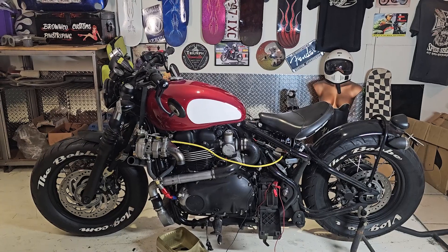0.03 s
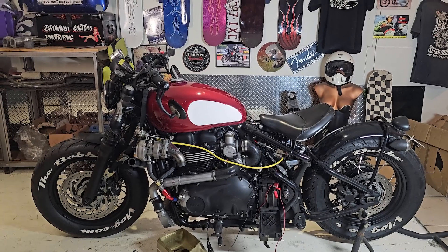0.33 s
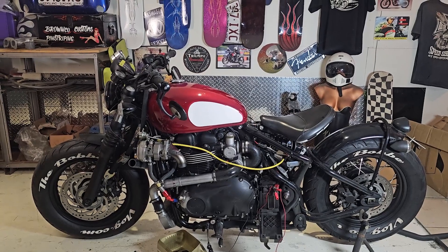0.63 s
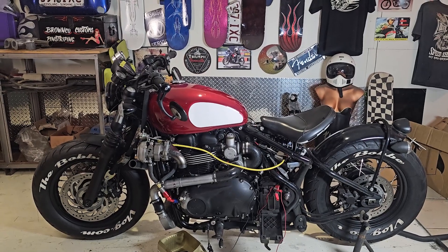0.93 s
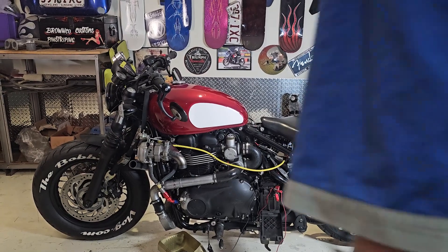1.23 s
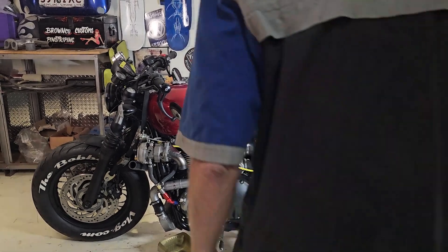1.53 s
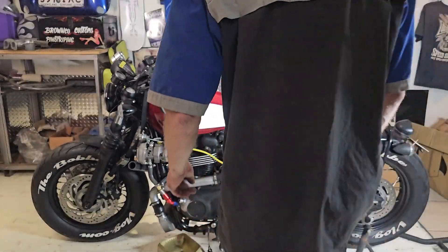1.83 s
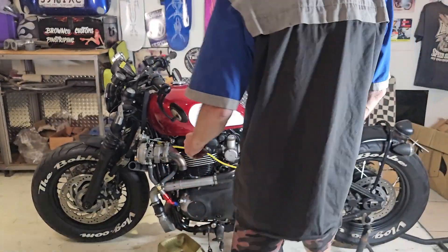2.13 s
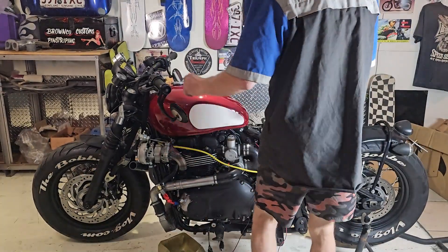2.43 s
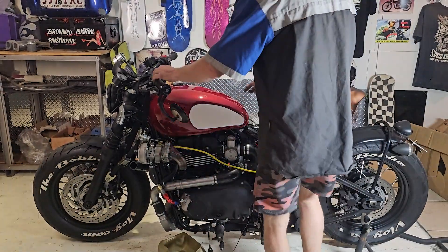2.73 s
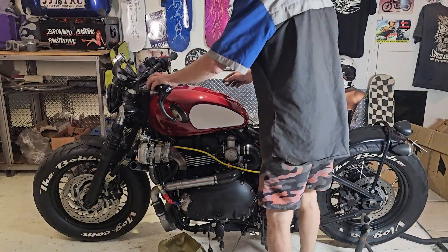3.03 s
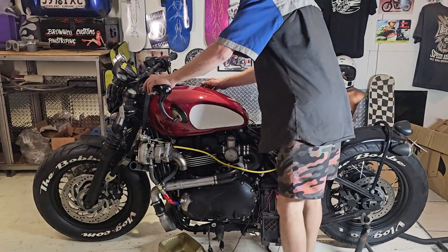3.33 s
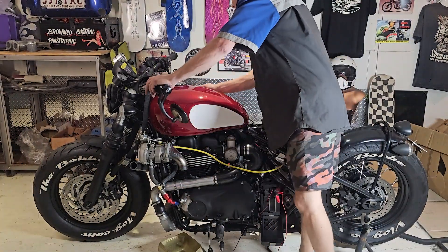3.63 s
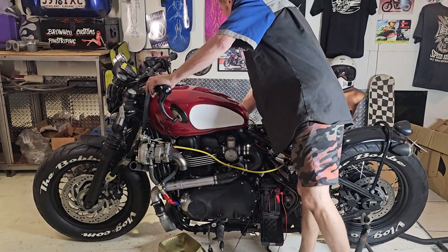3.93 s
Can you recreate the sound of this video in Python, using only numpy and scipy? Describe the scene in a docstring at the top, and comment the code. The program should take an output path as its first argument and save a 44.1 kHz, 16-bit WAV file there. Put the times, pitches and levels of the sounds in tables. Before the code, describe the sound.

Clothes rustle and soles land softly as someone walks close past the microphone in a garage, scraping twice on grit. They lean over a parked motorcycle with a dull shuffle and a metal clink. A distant motor drones throughout.

```python
"""A stereo microphone in a garage; a far motor drones over low rumble, slowly sinking in pitch.
From the start someone walks past close by: loose clothes swish and soles land softly.
Near 1.5 s and again just after 2 s the soles scrape loudest on the gritty floor.
About 3 s in, the walker leans over a parked motorcycle with a dull shuffle, then a metal part clinks.
The hard walls return every move."""
import sys
import numpy as np
from scipy import signal
from scipy.fft import rfft, irfft, next_fast_len
from scipy.io import wavfile
from scipy.ndimage import uniform_filter1d

SR = 44100
rng = np.random.default_rng(int(sys.argv[2]) if len(sys.argv) > 2 else 0)


def log_audio(samples):
    """Write samples as a 16-bit WAV file to the path given in sys.argv[1]."""
    # one column per channel
    frames = np.atleast_2d(samples).T
    # limit to full scale, then quantise
    limited = np.clip(frames, -1, 1)
    pcm = np.round(limited * 32767).astype(np.int16)
    wavfile.write(sys.argv[1], SR, pcm)


N = 4 * SR

# Clothes passing the microphone. Each row: start, rise, hold and fade in seconds, level in dB,
# then the offsets of the low rub and of the fine hiss in dB.
CLOTH_SWISHES = [(-.03, 0.012, 0.03, 0.18, -59, 0.5, 0), (0.074, 0.11, 0.081, 0.42, -59.5, -1.5, 1.5),
                 (0.565, 0.036, 0.15, .16, -63, 0, 9.5), (0.778, 0.12, 0.015, 0.18, -56, 0, 6.5),
                 (0.948, 0.047, 0.095, 0.18, -61, -3.5, 12), (1.15, 0.031, 0.087, 0.14, -69.5, -13, 8.5),
                 (1.278, 0.15, 0.03, 0.31, -58.5, 2, -5), (1.73, 0.041, 0.085, 0.25, -69, -6.5, 6.5),
                 (2.027, .04, 0.22, 0.13, -65, -7.5, -1), (2.336, 0.044, 0.11, 0.14, -75, 0.5, 0),
                 (2.525, 0.019, 0.044, 0.085, -57.5, -4.5, 3), (2.654, 0.043, 0.055, 0.1, -66, -4, -5),
                 (3.003, 0.0074, 0.031, 0.15, -65, -5, 6.5), (3.146, 0.059, .05, 0.19, -59.5, -7, -10),
                 (3.269, 0.024, 0.17, 0.12, -61, -8, 4.5)]
# The three bands of a swish. Each row: frequency in Hz, spectral level in dB.
CRINKLE_COLOUR = [(200, -41), (900, -12), (2200, -1.5), (3300, 2.5), (5000, 0), (7500, -3), (11000, -13.5),
                  (16000, -6)]
RUB_COLOUR = [(100, 13.5), (280, -5.5), (500, 4), (900, -0.5), (1600, -2.5), (2400, -4), (4500, -22),
              (16000, -26)]
HISS_COLOUR = [(200, -17), (3000, -14), (6500, -0.5), (8000, 6.5), (12000, 0.5), (16000, 3.5)]
# Footfalls and light taps. Each row: start in seconds, thud level in dB, slap level in dB.
FOOTFALLS = [(0.107, -45, -66), (0.119, -54.5, -70), (0.14, -56, -67), (0.204, -50, -61),
             (.327, -48.5, -54), (0.688, -55, -59), (0.731, -57, -55), (0.762, -57, -80),
             (0.92, -55.5, -60), (.999, -62, -61), (1.583, -53.5, -53.5), (2.199, -56.5, -70),
             (2.535, -54.5, -68), (2.552, -57, -67), (2.572, -58, -71), (3.006, -66, -76)]
# Soles on grit, hands on the motorcycle. Each row: peak time in seconds, level in dB,
# rise and fade in seconds, centre and width in Hz.
SCRAPE_STROKES = [(0.013, -56, 0.035, 0.1, 3720, 2200), (1.477, -45.5, .003, 0.054, 3470, 3200),
                  (1.502, -48.5, 0.026, 0.056, 1900, 1090), (2.077, -57, 0.018, 0.058, 3900, 2400),
                  (2.088, -44, 0.0043, 0.018, 3600, 1700), (2.197, -45.5, .003, 0.023, 2960, 2400),
                  (2.216, -52, 0.009, 0.044, 2370, 1800), (2.236, -54, 0.0015, 0.061, 2620, 2600),
                  (2.605, -56, 0.041, 0.074, 3620, 1600), (3.04, -69.5, 0.037, 0.17, 2270, 695),
                  (3.35, -68, 0.19, .3, 2070, 1200), (3.43, -52.5, .002, 0.047, 5400, 7200),
                  (3.955, -67.5, 0.0017, .05, 2340, 2200)]
# Grit and small hard contacts. Each row: start in seconds, level in dB.
GRIT_TICKS = [(.327, -42.5), (1.083, -51), (1.476, -51), (1.587, -46), (2.089, -56), (2.197, -65),
              (2.260, -54), (3.006, -58), (3.428, -48), (3.437, -45.5)]
# Tone of each kind of contact. Each row: frequency in Hz, spectral level in dB.
THUD_COLOUR = [(80, -8), (260, 4.5), (450, 3), (650, -2), (900, -5), (1400, -10), (2300, -14.5),
               (4000, -37), (16000, -66)]
SLAP_COLOUR = [(200, -8), (900, -12), (2000, -7), (4500, -6), (7500, -8), (12000, -27), (16000, -47)]
TICK_COLOUR = [(300, -25), (1500, -8.5), (4000, 0), (7000, -2), (16000, -2.5)]
BUMP_COLOUR = [(100, -20), (220, -2.5), (320, 14), (420, -13), (560, -5), (900, -26), (3000, -40)]
# The ringing metal part. Each row: frequency in Hz, relative level in dB, seconds to fall 60 dB.
METAL_MODES = [(2920, 1, 0.075), (5550, -0.5, 0.094), (6240, -18, 0.11)]
# The far motor. Each row: time in seconds, level of the fundamental in dB, level of the octave in dB.
MOTOR_LEVELS = [(0, -42.5, -60.5), (.35, -41, -64.5), (.6, -42, -64), (.95, -37, -66.5),
                (1.35, -39.5, -58.5), (1.85, -42, -60), (2.102, -39, -57), (2.5, -47, -66.5),
                (2.8, -49.5, -69.5), (3.12, -43.5, -71.5), (3.48, -51.5, -60.5), (3.62, -45, -57),
                (3.8, -43, -54.5), (4, -43, -51.5)]
# Room tone. Each row: frequency in Hz, spectral level in dB.
RUMBLE_COLOUR = [(20, -7), (40, -7.5), (56, 5.5), (72, 3), (100, -6.5), (160, -14), (290, -22.5),
                 (430, -28.5), (560, -35.5), (800, -40), (2000, -50), (6000, -53), (15000, -58.5)]
# Swell of the deepest rumble. Each row: time in seconds, gain in dB.
DEEP_SWELL = [(0, 2), (1, -3), (1.7, 0.5), (2.6, 1), (3.3, -1.5), (3.7, 2), (4, 3.5)]
# Faint resonances in the room tone. Each row: centre in Hz, width in Hz, level in dB.
ROOM_RESONANCES = [(209.5, 16, -70.5), (281.8, 42.5, -67.5), (526, 22, -79), (587, 15, -82.5),
                   (731, 44, -84), (945, 110, -84)]
# Microphone response. Each row: frequency in Hz, gain in dB, left minus right in dB.
MIC_RESPONSE = [(104, 0.5, 3), (1230, 0.5, 2), (2400, 0, 1), (4570, 0, -1), (7434, -0.5, -4),
                (8560, -14.5, 7.5), (10350, -10.5, -3), (11420, -1.5, 7.5), (13000, -8, 9),
                (15500, -10.5, 4.5)]

PERSON_WIDE_HZ, GARAGE_WIDE_HZ, RUMBLE_WIDE_HZ = 650, 510, 576  # each sounds wide above this
CONTACT_RISE_S = 0.0007


def clothes():
    """Close by, fibres catch and slip: each swish mixes a crinkling middle, a low rub and a fine hiss."""
    def fibres():
        return grains(per_s=7000, spread_db=3)
    crinkling = fibres() + undb(-8) * grains(per_s=110, spread_db=3.5)
    middle = shifting_resonances(unit(colour(crinkling, CRINKLE_COLOUR)))
    rub = unit(colour(fibres(), RUB_COLOUR)) * undb(1.94 * wander(70))
    hiss = unit(colour(fibres(), HISS_COLOUR))
    power = np.zeros((3, N))
    for start, rise, hold, fade, db, rub_db, hiss_db in CLOTH_SWISHES:
        gains = undb([db, db + rub_db, db + hiss_db - 4.5])
        power += (gains[:, None] * envelope(start, rise, hold, fade)) ** 2
    flutter = undb(-0.15 * wander(35.7))
    return flutter * sum(gain * band for gain, band in zip(np.sqrt(power), (middle, rub, hiss)))


def shifting_resonances(cloth, depth_db=3, width_hz=300, life_s=0.045):
    """As the walker moves, the path to the microphone changes, so narrow resonances come and go."""
    hz, at, spectrum = signal.stft(cloth, SR, nperseg=512)
    ripple = rng.standard_normal(spectrum.shape[1:])
    ripple = uniform_filter1d(ripple, round(width_hz / hz[1]), axis=0)
    ripple = uniform_filter1d(ripple, round(life_s / at[1]), axis=1)
    _, folded = signal.istft(spectrum * undb(depth_db * unit(ripple)), SR)
    return unit(folded[:, :N])


def steps():
    """Soles land near the microphone, each a soft thud with a short bright slap."""
    thud = unit(colour(diffuse(PERSON_WIDE_HZ), THUD_COLOUR))
    slap = unit(colour(diffuse(PERSON_WIDE_HZ), SLAP_COLOUR))
    return sum(undb(thud_db) * thud * envelope(at, CONTACT_RISE_S, hold_s=0, fade_s=0.044)
               + undb(slap_db) * slap * envelope(at, CONTACT_RISE_S, hold_s=0, fade_s=0.048)
               for at, thud_db, slap_db in FOOTFALLS)


def scrapes():
    """A sole drags on grit or a hand on the motorcycle, crackling in one broad resonance."""
    sound = np.zeros((2, N))
    for peak, db, rise, fade, hz, width_hz in SCRAPE_STROKES:
        crackle = resonate(grains(per_s=2200, spread_db=2), hz, width_hz)
        sound += undb(db) * crackle * envelope(peak - rise, rise, 0, fade)
    return sound


def ticks():
    """Grit and small hard contacts give bright snaps a few milliseconds long."""
    snap = unit(colour(diffuse(PERSON_WIDE_HZ), TICK_COLOUR))
    return snap * sum(undb(db) * envelope(at, CONTACT_RISE_S, hold_s=0, fade_s=0.0083)
                      for at, db in GRIT_TICKS)


def shuffle():
    """Dull uneven bumping as the walker's weight shifts against the motorcycle."""
    bumps = unit(colour(grains(per_s=72, spread_db=2), BUMP_COLOUR))
    return undb(-63.5) * bumps * envelope(start_s=2.93, rise_s=0.081, hold_s=0.12, fade_s=0.36)


def clink(start_s=3.429):
    """A small metal part is knocked and rings briefly in three modes."""
    age = np.maximum(times() - start_s, 0)
    return sum(undb(db - 54 - 60 * age / t60) * np.sin(2 * np.pi * hz * age)
               for hz, db, t60 in METAL_MODES)


def garage(direct, dull_t60_s=0.38, bright_t60_s=0.33):
    """The direct sound reaches the microphone with a tail off the hard walls; the treble dies first."""
    t = times()[:SR // 2]
    noise = diffuse(GARAGE_WIDE_HZ, len(t))
    dull = colour(noise, [(1500, -14.5), (8000, -21.5)])
    bright = noise - dull
    tail = dull * undb(-60 * t / dull_t60_s) + bright * undb(-60 * t / bright_t60_s)
    echoes = signal.fftconvolve(direct, unit(tail) / np.sqrt(len(t)), axes=1)[:, :N]
    return undb(-1.5) * direct + undb(-3.5) * echoes


def motor(start_hz=121.5, sag_hz_per_s=1.13):
    """Far off, a motor slowly runs down: a strong fundamental and two weak overtones swell and fade."""
    at, fundamental_db, octave_db = np.array(MOTOR_LEVELS).T
    t = times()
    phase = 2 * np.pi * np.cumsum(start_hz - sag_hz_per_s * t) / SR
    drone = np.zeros(N)
    for harmonic, db in enumerate([fundamental_db, octave_db - 0.5, fundamental_db - 34.5], start=1):
        wavering_db = np.interp(t, at, db) + 0.55 * wander(15)
        drone += np.sqrt(2) * undb(wavering_db) * np.sin(harmonic * phase)
    return drone


def rumble():
    """Room tone from all around: slowly swelling rumble, a trace of hiss and a few faint resonances."""
    bed = undb(-50.5) * unit(colour(diffuse(RUMBLE_WIDE_HZ), RUMBLE_COLOUR))
    deep = colour(bed, [(100, 1), (200, -30.5)])
    swell = undb(np.interp(times(), *np.array(DEEP_SWELL).T))
    air = diffuse(RUMBLE_WIDE_HZ)
    resonances = sum(undb(db) * resonate(air, hz, width_hz) for hz, width_hz, db in ROOM_RESONANCES)
    return bed + (swell - 1) * deep + resonances


def undb(db):
    """Decibels to gain."""
    return 10 ** (np.asarray(db) / 20)


def unit(x):
    """Scale to rms 1."""
    return x / np.sqrt(np.mean(x ** 2))


def times():
    """Time of every sample in seconds."""
    return np.arange(N) / SR


def envelope(start_s, rise_s, hold_s, fade_s):
    """Rise, hold, then fall by 20 dB in each fade time."""
    age = times() - start_s
    return np.clip(age / rise_s, 0, 1) * 10 ** (-np.maximum(age - rise_s - hold_s, 0) / fade_s)


def wander(per_s):
    """Smooth random drift at rms 1."""
    span = int(SR / per_s)
    stairs = np.repeat(rng.standard_normal(N // span + 1), span)
    return unit(uniform_filter1d(uniform_filter1d(stairs, span), span)[:N])


def shape(x, gain_at):
    """Filter by a gain given as a function of frequency."""
    size = next_fast_len(x.shape[-1] + 4096)
    hz = np.maximum(np.fft.rfftfreq(size, 1 / SR), 1)
    return irfft(rfft(x, size) * gain_at(hz), size)[..., :x.shape[-1]]


def colour(x, points):
    """Filter by (Hz, dB) points."""
    hz, db = np.array(points).T
    return shape(x, lambda f: undb(np.interp(np.log(f), np.log(hz), db)))


def resonate(x, hz, width_hz):
    """One resonance with steep skirts, at rms 1."""
    return unit(shape(x, lambda f: 1 / (1 + ((f / hz - hz / f) * hz / width_hz / 2) ** 2) ** 2))


def widen(pair, wide_hz, side_db=0):
    """Two unrelated signals become left and right: alike in the bass, wide above."""
    side = undb(side_db) * shape(pair[1], lambda f: f / np.hypot(f, wide_hz))
    return np.array([pair[0] + side, pair[0] - side])


def diffuse(wide_hz, size=N):
    """Noise that reaches the microphone from all around."""
    return widen(rng.standard_normal((2, size)), wide_hz)


def grains(per_s, spread_db):
    """Tiny clicks of uneven size, from scattered places."""
    size = undb(spread_db * np.minimum(rng.exponential(size=(2, N)), 4))
    clicks = (rng.random((2, N)) < per_s / SR) * size * rng.choice([-1, 1], (2, N))
    return unit(widen(clicks, PERSON_WIDE_HZ, side_db=-1.5))


def scene():
    """The walker close by in the garage; motor and rumble behind, a little to the right."""
    person = garage(clothes() + scrapes() + steps() + ticks() + shuffle() + clink())
    return person + (motor() + rumble()) * undb([[-0.6], [0.6]])


def record(dry, top_hz=15800):
    """Two microphone ports with a notch in the treble, the left one brighter; the top is cut."""
    hz, db, lean_db = np.array(MIC_RESPONSE).T
    left = colour(dry[0], np.c_[hz, db + lean_db / 2])
    right = colour(dry[1], np.c_[hz, db - lean_db / 2])
    top_cut = signal.ellip(10, 0.2, 80, top_hz, fs=SR, output="sos")
    return signal.sosfilt(top_cut, np.array([left, right]))


dry = scene()
out = record(dry)
log_audio(out)
```